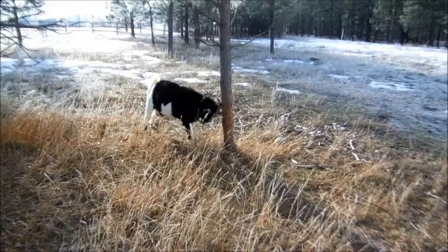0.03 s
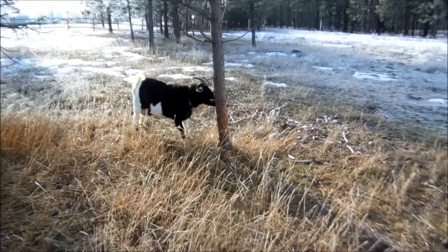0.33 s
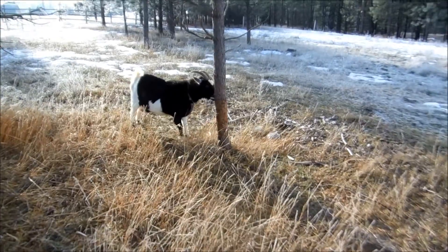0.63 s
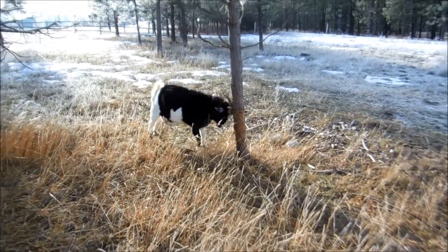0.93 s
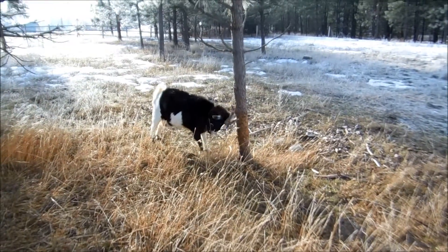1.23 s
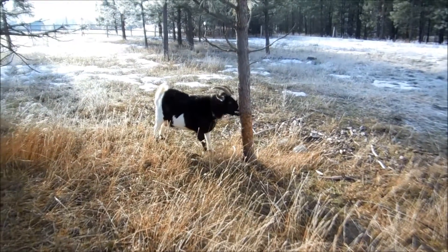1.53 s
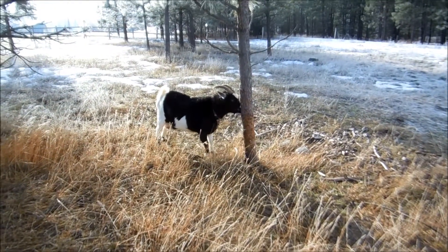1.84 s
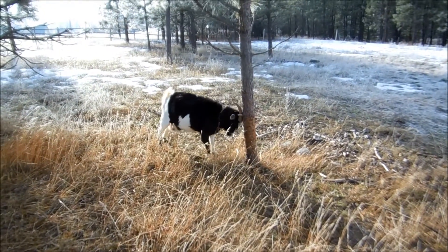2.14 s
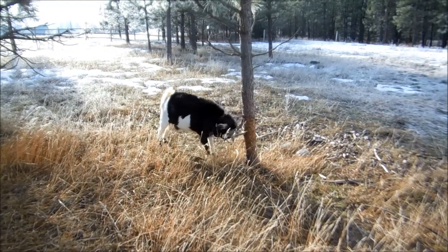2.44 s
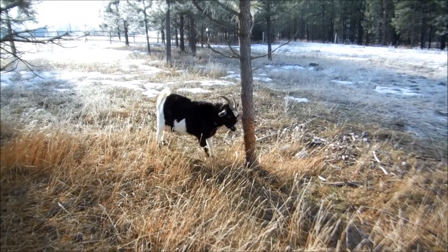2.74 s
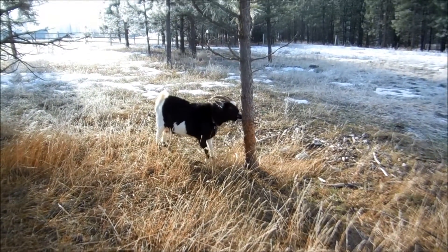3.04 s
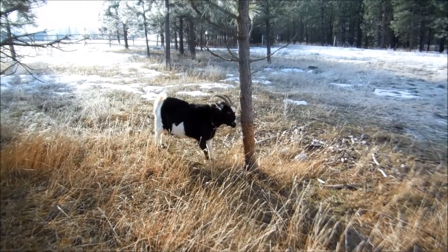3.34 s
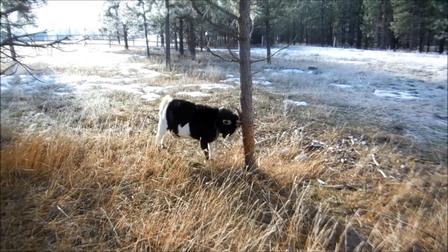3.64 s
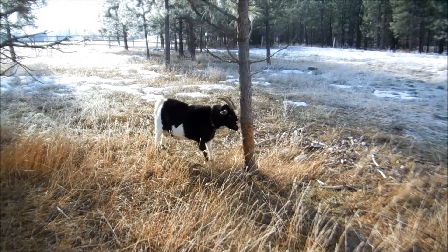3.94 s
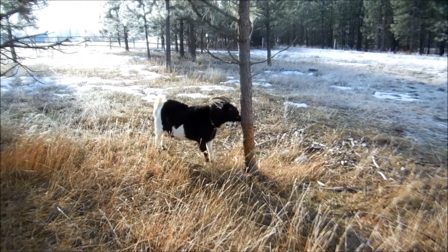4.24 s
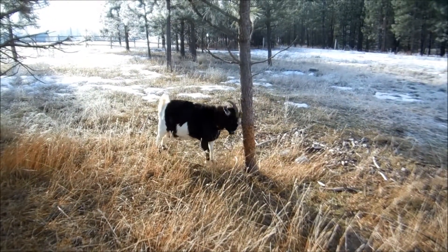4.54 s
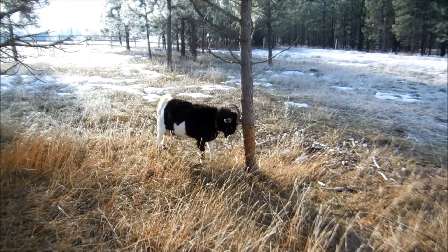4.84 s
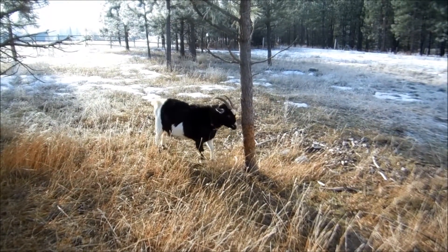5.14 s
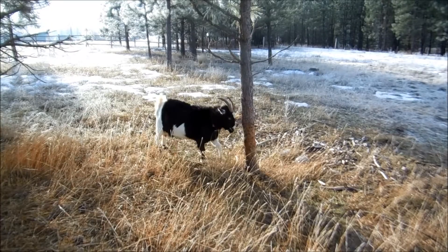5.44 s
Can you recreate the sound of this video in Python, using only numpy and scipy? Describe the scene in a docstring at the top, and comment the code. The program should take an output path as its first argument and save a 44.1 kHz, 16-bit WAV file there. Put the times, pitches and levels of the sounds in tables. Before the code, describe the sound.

A low gust of wind buffets the right side of the microphone and dies away. Then a goat butts a pine trunk four times, a little over a second apart, each blow a dull thud with a knock of horns and a crunch of bark. Between the blows its horns scrape lightly and small chips crack off. The open meadow has no echo, only a low rumble, a distant rush and faintly stirring dry grass.

```python
"""Wind buffets the right microphone port as the sound stutters in on a frosty meadow.
Behind it lie a low rumble, a distant rush, a faint hum and stirring dry grass.
Out in the open a goat butts a pine trunk four times: bark crunches, skull and horns knock, the trunk
thuds. Between the butts it rubs its horns on the bark and chips crack off."""
import sys
import numpy as np
from scipy import signal
from scipy.fft import rfft, irfft, next_fast_len
from scipy.io import wavfile
from scipy.ndimage import uniform_filter1d, map_coordinates

SR = 44100
rng = np.random.default_rng(int(sys.argv[2]) if len(sys.argv) > 2 else 0)


def generate_wav(signal):
    """Clip the signal to [-1, 1] and save it as 16-bit WAV at the path in sys.argv[1]."""
    frames = np.transpose(np.atleast_2d(signal))
    scaled = np.clip(frames, -1, 1) * 32767
    pcm = np.round(scaled).astype(np.int16)
    wavfile.write(sys.argv[1], SR, pcm)


N = 246078
TIME = np.arange(N) / SR

# Gusts on the microphone. Each row: start in seconds, length in seconds, level in dB, drift in dB.
WIND_GUSTS = [(.17, .35, -33.5, -7.5), (.69, .05, -51, 0)]
GUST_ATTACK_S, GUST_T60_S = .055, .3
# Single eddies at the port. Each row: time in seconds, suction in dB, half width in seconds.
PORT_EDDIES = [(.255, -20, 0.0014), (.296, -19.5, 0.001), (0.325, -20.5, 0.0011), (0.373, -18.5, 0.0017),
               (.695, -20, 0.0024), (0.75, -24.5, 0.0016)]
# Colours of the wind on the port, the low rumble, the distant rush and the hiss.
# Each row: frequency in Hz, relative density in dB.
BUFFET_SPECTRUM = [(12, 1.5), (35, 7.5), (70, -4), (120, -6.5), (200, -6), (320, -28), (700, -31),
                   (2000, -44.5)]
RUMBLE_SPECTRUM = [(15, -20), (30, 2), (50, -4.5), (70, 4), (82, 0.5), (98, 1), (115, -1.5), (140, -4.5),
                   (175, -11), (260, -18.5), (400, -31), (900, -40)]
RUSH_SPECTRUM = [(120, -8.5), (300, -9), (430, -4), (600, 0), (1000, 1), (1250, -3.5), (1600, -4.5),
                 (2000, -13), (2600, -21.5), (4000, -47), (9000, -50)]
HISS_SPECTRUM = [(300, 9), (2000, 6.5), (4000, 0), (8000, -0.5), (12000, 0), (16000, -2)]
SETTLE_S = 1.13  # time constant of the dying breeze
# Swells of the distant hum. Each row: time of the peak in seconds, level in dB.
DISTANT_SWELLS = [(.92, -59), (3.35, -62.5)]
HUM_DB, HUM_SWELL_S = -68, 0.14
# Dry grass swishing. Each row: start in seconds, length in seconds, level in dB, drift in dB.
GRASS_SWISHES = [(.13, .1, -53.5, -5), (.83, 0.088, -62, -1), (4.88, .3, -64.5, -3)]
SWISH_ATTACK_S, SWISH_T60_S, GRASS_DB = .08, 0.57, -71

# Bark crushed by a butt. Each row: time in seconds, then splinter, body and crumble levels in dB.
BARK_CRUNCHES = [(1.0565, -29.5, -34.5, -40.5), (2.338, -34, -46, -41.5), (3.7427, -41, -45, -62),
                 (3.7462, -40.5, -35, -60), (4.8119, -28.5, -35, -57)]
SNAP_RISE_S, SNAP_T60_S = 0.00084, .02
CRUMBLE_LAG_S, CRUMBLE_RISE_S, CRUMBLE_T60_S, CRUMBLE_BODY_DB = .006, .002, 0.1, -1.5
# Thin chips flicking off the trunk. Each row: time in seconds, level in dB.
BARK_CHIPS = [(1.094, -44), (1.0983, -50), (1.2303, -42), (1.4685, -40.5), (1.624, -54), (2.559, -46),
              (2.796, -45), (3.823, -54), (4.839, -43), (4.956, -49), (4.974, -53), (5.308, -47.5)]
CHIP_RISE_S, CHIP_T60_S, CHIP_BODY_DB = .0006, .016, -16
# Colours of a crack's splinters, of its body, and of rasping bark or grass.
# Each row: frequency in Hz, relative density in dB.
SPLINTER_SPECTRUM = [(1500, -30), (3600, -13), (4800, 0), (5500, -2.5), (6400, 2.5), (7800, -3),
                     (9300, 3.5), (12000, 1.5), (14500, -1), (16000, -5)]
BODY_SPECTRUM = [(200, 6.5), (400, 5.5), (750, 1.5), (1500, 3.5), (2100, 0.5), (2500, -2.5), (3500, -2.5),
                 (4500, 2.5), (6000, -4.5), (9000, -16), (16000, -31)]
RASP_SPECTRUM = [(300, -21), (1500, -6), (2400, -1), (2900, -0.5), (3600, -1), (4850, -0.5), (5400, -0.5),
                 (6300, -0.5), (7700, 0.5), (9600, 2), (12500, 1.5), (16000, -4)]
# The head meeting the tree. Each row: time in seconds, then trunk, skull and horn levels in dB.
HEAD_BLOWS = [(1.058, -36, -51, -44), (1.0698, -37.5, -34.5, -49), (1.294, -58, -48, -46),
              (2.3477, -33, -37.5, -57), (2.529, -54, -46, -43), (2.548, -50, -56, -49),
              (3.7422, -56, -44, -57), (3.7462, -60, -28, -47), (4.81, -28, -33, -32.5)]
# How each part rings. Each row: frequency in Hz, relative level in dB, time to fall 60 dB in seconds.
TRUNK_MODES = [(74.5, 2.5, 0.092), (153.6, 11, 0.053), (189, 3.5, 0.068), (283, -7, 0.033)]
SKULL_MODES = [(515, -2.5, 0.025), (570.5, -1.5, 0.029), (655, -2, 0.023), (794, -22, 0.011),
               (1165, -23, 0.019)]
HORN_MODES = [(1280, -10, 0.02), (1970, -13, 0.011), (2768, 1, 0.017), (2893, 5, 0.02), (4250, -19, 0.013),
              (4700, -16, 0.015)]
# Horns drawn along the bark. Each row: start in seconds, length in seconds, level in dB, drift in dB.
HORN_STROKES = [(1.235, 0.097, -52, -2.5), (1.403, 0.068, -52, -4.5), (2.485, 0.082, -56, 7),
                (2.58, .05, -53, -1.5), (2.667, .07, -54, -1), (2.753, 0.041, -46, -4.5),
                (3.75, 0.063, -53, -2), (4.842, .035, -50.5, -7)]
STROKE_ATTACK_S, STROKE_T60_S = 0.019, .11

# How alike the two ports hear the field and the bark. Each row: frequency in Hz, likeness from 0 to 1.
FIELD_LIKENESS = [(100, 1), (500, 0.99), (1200, 0.53), (2500, 0), (5000, 0.032)]
BARK_LIKENESS = [(500, 0.79), (2000, 0.27), (12000, 0.23)]
# Where the field and the goat sit in the stereo image. Each row: frequency in Hz, left over right in dB.
FIELD_PAN = [(100, -1.5), (1300, -2.5), (2500, 0.5), (6000, 1), (14000, 0.5)]
GOAT_PAN = [(100, -0.5), (1300, -2.3), (2900, 0.5), (5500, 3.5), (12000, 6)]
# The delay between the ports. Each row: frequency in Hz, lead of the left port in radians.
LEFT_LEAD = [(100, 0.21), (500, 0.048), (1200, 0.94), (3000, 0.41), (6000, 0.53), (9000, -0.67),
             (15000, 0.4)]
# The stutter as the sound cuts in. Each row: time in seconds, gain from 0 to 1.
OPENING_STUTTER = [(.125, 0), (.129, 1), (.149, 1), (.153, 0), (.168, 0), (.170, 1)]
TOP_HZ = 15800


def amp(db):
    """Decibels to gain."""
    return 10 ** (np.asarray(db) / 20)


def unit(x):
    """Scale to rms 1."""
    return x / np.sqrt(np.mean(x ** 2) + 1e-20)


def along(points, hz):
    """Read (Hz, value) points on a log axis."""
    freqs, values = np.transpose(points)
    return np.interp(np.log(hz + 1), np.log(freqs + 1), values)


def white():
    """Two unrelated noises."""
    return rng.standard_normal((2, N))


def wobble(rate):
    """A smooth random curve, rate knots a second."""
    return map_coordinates(rng.standard_normal(int(N * rate / SR) + 4), [TIME * rate])


def wavering(hz, rate):
    """A fuzzy tone of rms 1 whose strength and phase drift, rate times a second."""
    phase = 2 * np.pi * hz * TIME
    return unit(wobble(rate) * np.sin(phase) + wobble(rate) * np.cos(phase))


def fade(t, t60):
    """Exponential decay from t = 0."""
    return np.exp(-np.log(1000) * np.maximum(t, 0) / t60)


def bump(s, width):
    """A bell curve that reaches 1 at time s."""
    return np.exp(-((TIME - s) / width) ** 2 / 2)


def strike(s, rise, t60):
    """A quick swell to 1 at time s, then a decay."""
    return np.exp(-(np.minimum(TIME - s, 0) / (2 * rise)) ** 2) * fade(TIME - s, t60)


def gestures(rows, attack, t60):
    """Gain of a run of gestures: each swells up to its start, holds while its level drifts, then fades."""
    power = np.zeros(N)
    for start, length, db, drift_db in rows:
        t = TIME - start
        swell = np.exp(-(np.minimum(t, 0) / attack) ** 2)
        held = amp(db + drift_db * np.clip(t / length, 0, 1))
        power += (swell * held * fade(t - length, t60)) ** 2
    return np.sqrt(power)


def settling(calm_db, lift_db):
    """Level in dB of a layer that sinks to calm with the breeze."""
    return calm_db + lift_db * np.exp(-TIME / SETTLE_S)


def filtered(x, response):
    """Filter x by a complex response of frequency."""
    size = next_fast_len(N + SR // 2)
    return irfft(rfft(x, size) * response(np.fft.rfftfreq(size, 1 / SR)), size)[..., :N]


def spread(pair, spectrum, likeness):
    """Colour two unrelated signals and blend them as mid and side into a stereo pair of rms 1."""
    def response(hz):
        angle = np.arccos(np.clip(along(likeness, hz), -1, 1)) / 2
        return amp(along(spectrum, hz)) * [np.cos(angle), np.sin(angle)]
    mid, side = filtered(pair, response)
    return unit(np.array([mid + side, mid - side]))


def ports(x, pan):
    """The camera body shades and delays the sound differently at its two microphone ports."""
    half = np.array([[.5], [-.5]])
    return filtered(x, lambda hz: amp(half * along(pan, hz)) * np.exp(1j * half * along(LEFT_LEAD, hz)))


def crackle(rate, spread_db, grain_t60, patchy_db, dust=.8):
    """Tiny fractures of uneven size over a dust of finer ones; each flake rings at its own pitches."""
    fractures = rng.random(N) < rate / SR
    sizes = fractures * amp(spread_db * np.clip(rng.standard_normal(N), -2, 2))
    power = np.abs(signal.fftconvolve(sizes ** 2, fade(TIME[:512], grain_t60) ** 2)[:N])
    grains = signal.stft(white() * np.sqrt(power / power.mean() + dust), nperseg=256)[2]
    patches = uniform_filter1d(rng.standard_normal(grains.shape[1:]), size=3, axis=0)  # across pitch
    patches = uniform_filter1d(patches, size=9, axis=1)  # across time
    return unit(signal.istft(grains * amp(patchy_db * unit(patches)), nperseg=256)[1][:, :N])


def ring(modes, attack):
    """One blow's ringing, of peak 1, a little different each time; a soft contact lets it swell."""
    t = TIME[:SR // 4]
    ringing = sum(amp(db + rng.standard_normal()) * np.sin(2 * np.pi * hz * t) * fade(t, t60)
                  for hz, db, t60 in modes)
    ringing *= 1 - np.exp(-(t / attack) ** 2)
    return ringing / np.abs(ringing).max()


def wind():
    """Right on the microphone, a dying gust buffets the right port, flutters and throws single eddies."""
    buffet = amp(1.5 * wobble(12.9)) * spread(white(), BUFFET_SPECTRUM, likeness=[(50, 0.37), (300, .3)])
    flutter = wavering(hz=68.6, rate=24)
    draught = amp(settling(calm_db=-66, lift_db=15))
    strength = np.hypot(draught, gestures(WIND_GUSTS, GUST_ATTACK_S, GUST_T60_S))
    gust = strength * (amp(-1.5) * buffet + amp(-1.0) * flutter)
    suction = -sum(amp(db) * bump(s, width) for s, db, width in PORT_EDDIES)
    low_cut_hz = 20
    eddies = filtered(suction, lambda hz: 1j * hz / (low_cut_hz + 1j * hz))
    return (gust + eddies) * amp([[-12], [0]])  # left, right


def distant_air():
    """A low rumble and a far rush, both sinking as the breeze settles."""
    rumble_db = settling(calm_db=-46.5, lift_db=1.5) + 0.42 * wobble(4.89)
    rumble = amp(rumble_db) * spread(white(), RUMBLE_SPECTRUM, FIELD_LIKENESS)
    rush_db = settling(calm_db=-53.2, lift_db=4) + 0.17 * wobble(7)
    rush = amp(rush_db) * spread(white(), RUSH_SPECTRUM, FIELD_LIKENESS)
    return rumble + rush


def distant_hum():
    """Far off, a faint wavering hum swells twice over a low drone."""
    swells = sum(amp(db) * bump(s, HUM_SWELL_S) for s, db in DISTANT_SWELLS)
    hum = np.hypot(amp(HUM_DB), swells) * wavering(hz=380.5, rate=20)
    drone = amp(-56.5) * wavering(hz=96.2, rate=11) + amp(-58) * wavering(hz=68.9, rate=10)
    return hum + drone


def dry_grass():
    """Dry stalks stir faintly in the meadow and swish now and then."""
    stalks = crackle(rate=270, spread_db=4, grain_t60=.004, patchy_db=2)
    strength = np.hypot(amp(GRASS_DB), gestures(GRASS_SWISHES, SWISH_ATTACK_S, SWISH_T60_S))
    return strength * spread(stalks, RASP_SPECTRUM, FIELD_LIKENESS)


def hiss():
    """An even hiss, unrelated at the two ports."""
    return amp(-57.5) * spread(white(), HISS_SPECTRUM, likeness=[(1000, 0), (4000, 0)])


def bark_cracks():
    """Bark gives way in swarms of fractures: a snap and a crumble under each butt, a tick for each chip."""
    splinter_power, body_power = np.zeros((2, N))
    for s, splinter_db, body_db, crumble_db in BARK_CRUNCHES:
        snap = strike(s, SNAP_RISE_S, SNAP_T60_S)
        crumble = amp(crumble_db) * strike(s + CRUMBLE_LAG_S, CRUMBLE_RISE_S, CRUMBLE_T60_S)
        splinter_power += (amp(splinter_db) * snap) ** 2 + crumble ** 2
        body_power += (amp(body_db) * snap) ** 2 + (amp(CRUMBLE_BODY_DB) * crumble) ** 2
    for s, db in BARK_CHIPS:
        tick = amp(db) * strike(s, CHIP_RISE_S, CHIP_T60_S)
        splinter_power += tick ** 2
        body_power += (amp(CHIP_BODY_DB) * tick) ** 2
    swarm = crackle(rate=9000, spread_db=2, grain_t60=.0015, patchy_db=2)
    splinters = np.sqrt(splinter_power) * spread(swarm, SPLINTER_SPECTRUM, BARK_LIKENESS)
    body = np.sqrt(body_power) * spread(white(), BODY_SPECTRUM, BARK_LIKENESS)
    return splinters + body


def head_butts():
    """Each blow shakes the trunk, knocks the skull and rings the horns; crushing bark cushions it."""
    blows = np.zeros(N + SR)
    for s, thud_db, knock_db, horn_db in HEAD_BLOWS:
        thud = amp(thud_db) * ring(TRUNK_MODES, attack=0.0019)
        knock = amp(knock_db) * ring(SKULL_MODES, attack=.003)
        horn = amp(horn_db) * ring(HORN_MODES, attack=0.0014)
        blows[round(s * SR):][:len(thud)] += thud + knock + horn
    return blows[:N]


def horn_rubbing():
    """Horn ridges rasp over bark flakes, and the rasp rings the horn a little."""
    rasp = crackle(rate=700, spread_db=4, grain_t60=.002, patchy_db=3)
    flakes = spread(rasp, RASP_SPECTRUM, likeness=[(500, 0.69), (3000, 0.65), (12000, 0.6)])
    horn = unit(signal.fftconvolve(rasp[0], ring(HORN_MODES, attack=0.0045))[:N])
    strokes = gestures(HORN_STROKES, STROKE_ATTACK_S, STROKE_T60_S)
    return strokes * (flakes * amp([[-.5], [.5]]) + amp(-25.0) * horn)


def scene():
    """The microphone faces the goat at its tree in the open meadow, with no walls to answer."""
    goat = head_butts() + bark_cracks() + horn_rubbing()
    distance = distant_air() + distant_hum()
    return ports(goat + dry_grass(), GOAT_PAN) + ports(distance + hiss(), FIELD_PAN) + wind()


def record(dry):
    """The camera starts with a stutter and falls off steeply at its band limit."""
    stutter = np.interp(TIME, *np.transpose(OPENING_STUTTER))
    return filtered(dry * stutter, lambda hz: 1 / np.sqrt(1 + (hz / TOP_HZ) ** 200))


dry = scene()
out = record(dry)
generate_wav(out)
```